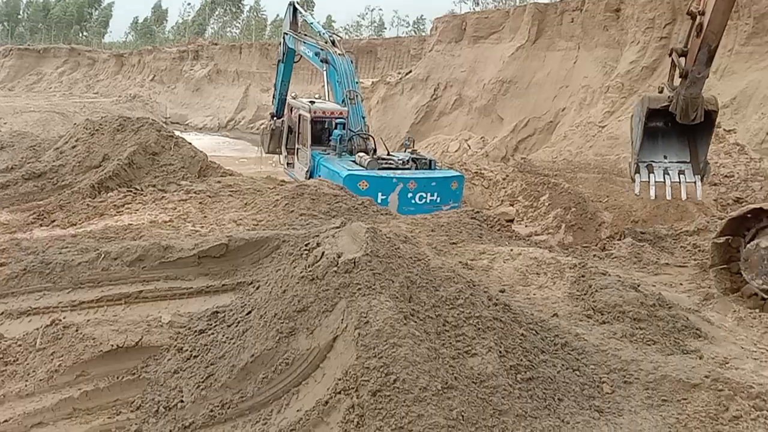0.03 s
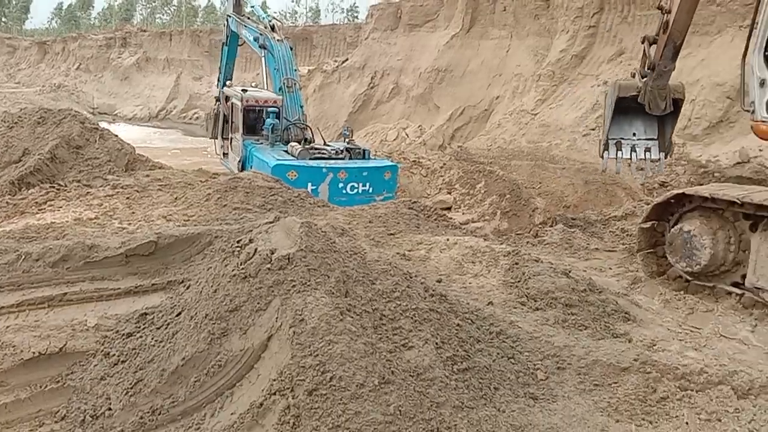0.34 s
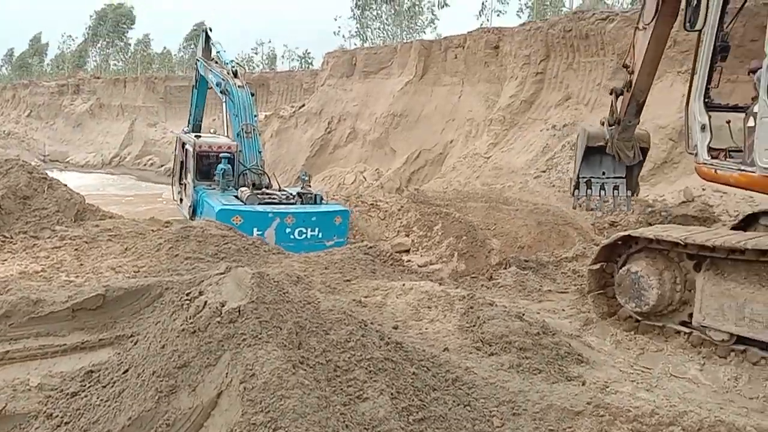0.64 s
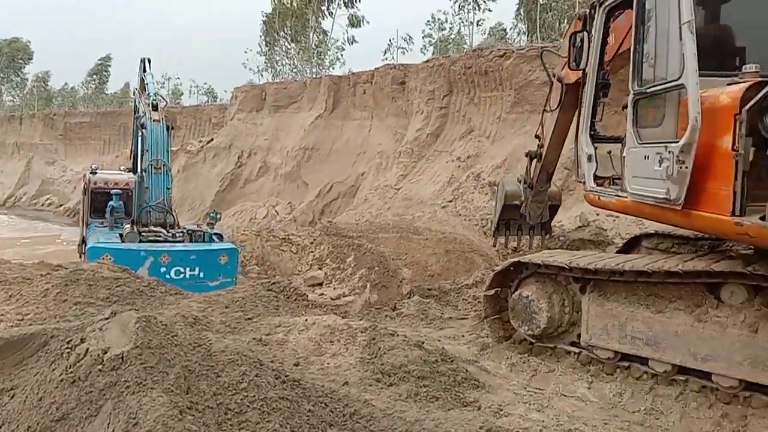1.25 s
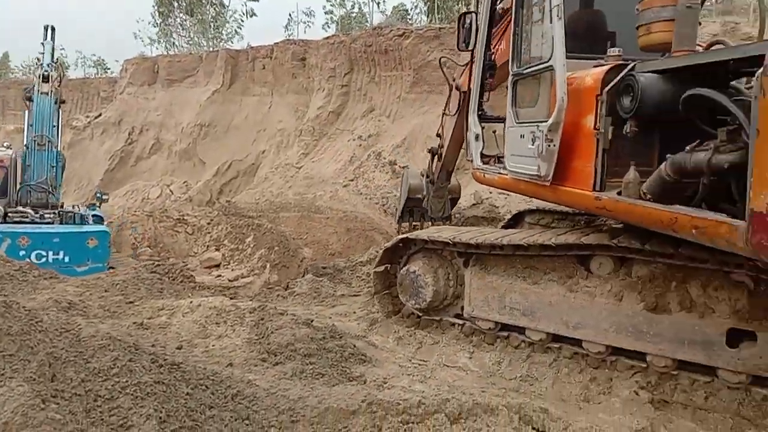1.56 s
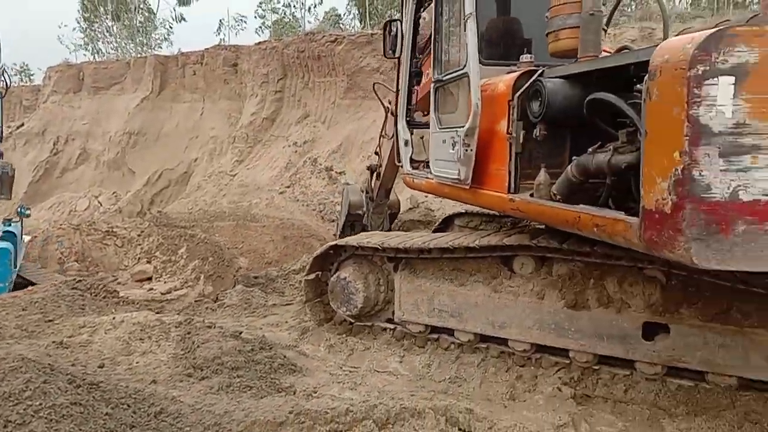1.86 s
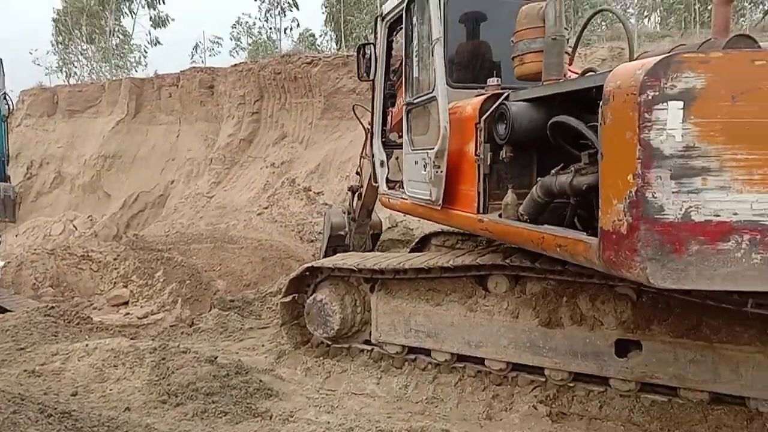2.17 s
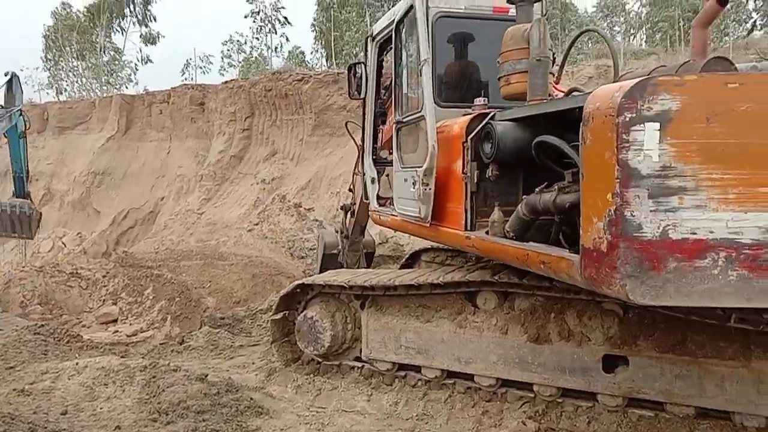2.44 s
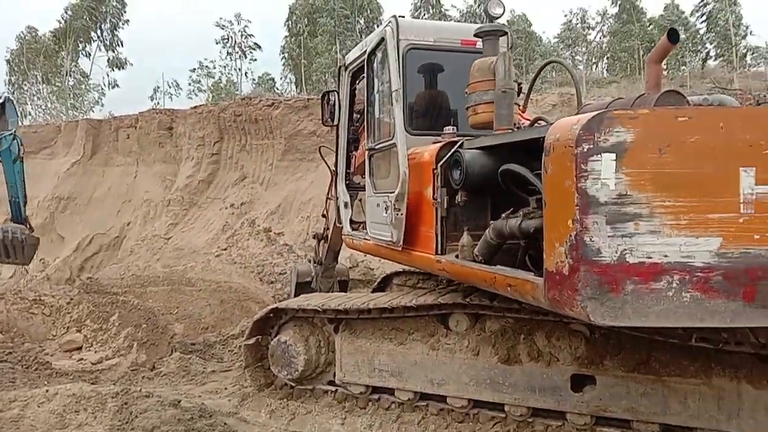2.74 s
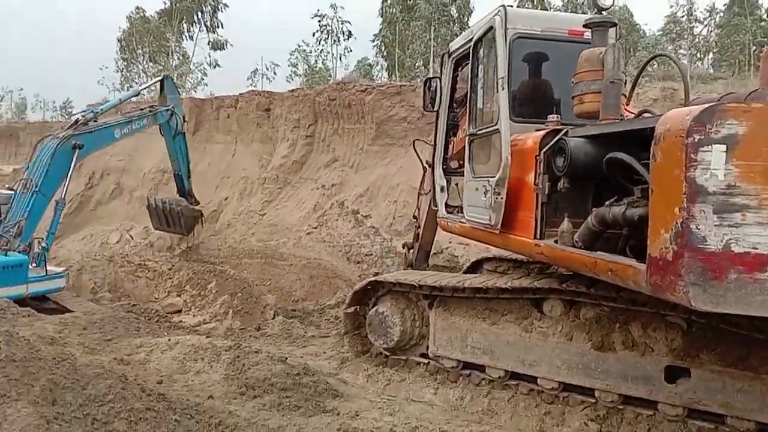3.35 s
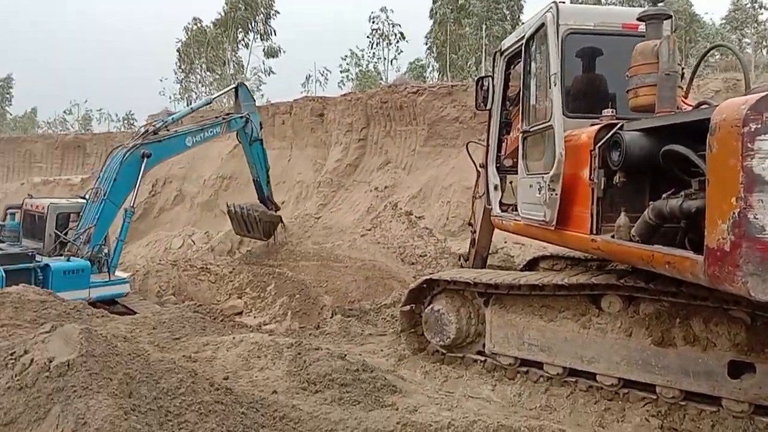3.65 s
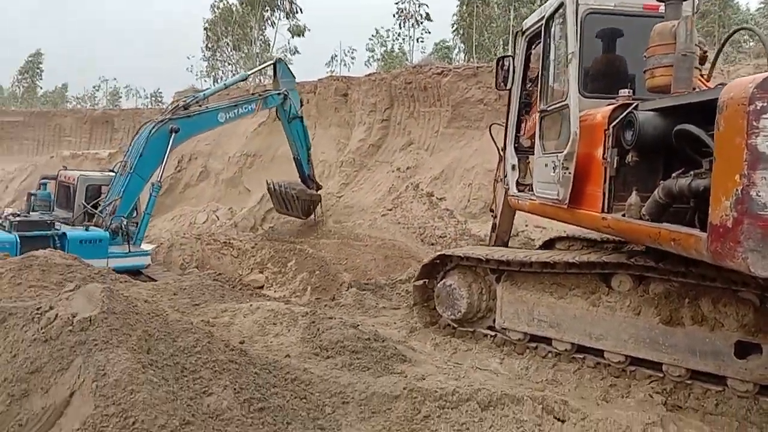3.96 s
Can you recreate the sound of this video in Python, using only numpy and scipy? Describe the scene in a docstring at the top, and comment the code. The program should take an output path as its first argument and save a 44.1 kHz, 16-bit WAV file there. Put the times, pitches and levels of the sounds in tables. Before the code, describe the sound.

A nearby excavator diesel engine clatters steadily in a sand pit, with a low fan hum and a hiss that swells midway. Behind it a second excavator drones and whines, rising briefly in pitch.

```python
"""A near diesel excavator clatters at a nearly steady speed in a sand pit: combustion knocks and valve
ticks modulate its air noise, its fan hums at the blade-passing frequency, and an open side hatch hisses.
A second excavator works behind it. Its exhaust drones in harmonics of the four-stroke cycle and its pump
drive whines at the gear-mesh frequency, both rising in pitch when the load comes off.
The sound fades in and is the same in both ears."""
import sys
import numpy as np
from scipy import signal
from scipy.fft import rfft, irfft
from scipy.io import wavfile

SR = 44100
rng = np.random.default_rng(int(sys.argv[2]) if len(sys.argv) > 2 else 0)


def file_out(sig):
    """Save sig as 16-bit WAV at sys.argv[1]."""
    # one column per channel
    cols = np.atleast_2d(sig).T
    # limit, then scale
    lim = np.clip(cols, -1, 1)
    pcm = np.round(lim * 32767).astype(np.int16)
    wavfile.write(sys.argv[1], SR, pcm)


N = 176400
TIME = np.arange(N) / SR


def from_db(db):
    """Amplitude ratio of a level in decibels."""
    return 10 ** (np.asarray(db) / 20)


def unit_rms(x):
    """Normalisation to an rms of 1."""
    return x / np.sqrt(np.mean(x ** 2) + 1e-20)


def in_time(rows):
    """Linear interpolation of each column of a time table to every sample."""
    times, *columns = np.transpose(rows)
    return [np.interp(TIME, times, column) for column in columns]


def at_hz(points, hz):
    """Interpolation of a spectrum on a logarithmic frequency axis."""
    f, value = np.transpose(points)
    return np.interp(np.log(np.maximum(hz, 1)), np.log(f), value)


def drift(rate_hz):
    """Slow random fluctuation: low-passed noise of unit rms."""
    step, settle = 40, 2000  # samples per coarse step; steps for the filter to settle
    pole = np.exp(-2 * np.pi * rate_hz * step / SR)
    noise = rng.standard_normal(N // step + settle + 2)
    slow = signal.lfilter([1], [1, -2 * pole, pole * pole], noise)[settle:]
    return np.interp(np.arange(N) / step, np.arange(len(slow)), unit_rms(slow))


def partial(turns, db):
    """Simple harmonic motion at an rms level, its phase counted in turns."""
    return np.sqrt(2) * from_db(db) * np.sin(2 * np.pi * (turns + rng.random()))


def die_away(clicks, decay_s):
    """Damping: each impulse decays exponentially."""
    return signal.lfilter([1], [1, -np.exp(-1 / (decay_s * SR))], clicks + 1e-18)


def resonance(centre_hz, half_width_hz):
    """A randomly driven resonance: narrow-band noise of unit rms, whose centre may move."""
    low_pass = signal.butter(2, half_width_hz, fs=SR, output="sos")
    in_phase, quadrature = signal.sosfilt(low_pass, rng.standard_normal((2, N)))
    angle = 2 * np.pi * np.cumsum(centre_hz * np.ones(N)) / SR
    return unit_rms(in_phase * np.cos(angle) + quadrature * np.sin(angle))


# Firing tone and rough growl of the exhaust: t/s, firing level/dB, growl level/dB
EXHAUST_LEVELS = [(.2, -28, -22.5), (.42, -30.5, -27.5), (.75, -29, -33.5), (1.1, -30, -35),
                  (1.65, -30, -30), (2.0, -29.5, -36), (2.4, -29.5, -49), (2.56, -33.5, -44),
                  (2.8, -26, -46), (3.0, -35.5, -49), (3.35, -27.5, -44), (3.65, -28, -37), (4, -38.5, -40)]
# Strong harmonics of the four-stroke cycle: harmonic number, level/dB
STRONG_HARMONICS = [(9, -38), (12, -32), (21, -41), (24, -37), (27, -43), (41, -37), (66, -37), (68, -38)]
# Envelope of the weak harmonics, due to unequal cylinders: f/Hz, level/dB
WEAK_HARMONICS = [(42, -54.5), (56, -49), (75, -58), (110, -52), (160, -45), (205, -41.5), (300, -47.5),
                  (500, -45.5), (720, -50), (900, -48.5), (1150, -47.5), (1600, -51)]


def exhaust(cycles, cycle_hz, firing_harmonic=6):
    """Periodic gas pulses form a harmonic series, over a broad growl and the narrow pipe resonance."""
    firing_db, growl_db = in_time(EXHAUST_LEVELS)
    strong_db = dict(STRONG_HARMONICS)
    growl = from_db(growl_db) * resonance(centre_hz=643.5, half_width_hz=40)
    pipe = from_db(-39.5) * resonance(centre_hz=605, half_width_hz=5.7)
    drone = np.zeros(N)
    for k in range(3, 105):
        mean_db = strong_db.get(k, at_hz(WEAK_HARMONICS, k * cycle_hz))
        wavering_db = mean_db + 3 * drift(rate_hz=1.3)
        drone += partial(k * cycles, firing_db if k == firing_harmonic else wavering_db)
    return growl + pipe + drone


# First three gear-mesh harmonics: t/s, first level/dB, second level/dB, third level/dB
WHINE_LEVELS = [(.2, -23, -36, -44), (.5, -16, -37, -44), (.7, -22.5, -31.5, -42), (1.1, -18.7, -29, -41),
                (1.45, -21.5, -42, -30), (1.75, -22.5, -44, -32), (2.0, -34, -46, -42),
                (2.25, -26, -46, -40), (2.6, -35, -37, -29.5), (2.95, -34, -32, -30.5),
                (3.15, -31.5, -42, -42), (3.58, -23, -36, -40), (4, -31, -47, -42)]


def pump_whine(meshes):
    """Periodic tooth contact in the pump drive radiates harmonics of the mesh frequency."""
    return sum(partial(k * meshes, db + 1.4 * drift(rate_hz=16))
               for k, db in enumerate(in_time(WHINE_LEVELS), 1))


# Gear-mesh frequency, proportional to the working engine's speed: t/s, f/Hz
MESH_FREQUENCY = [(.2, 1036), (.36, 1042), (.5, 1037), (.68, 1050), (.85, 1044), (1.3, 1043), (1.6, 1040),
                  (1.87, 1029), (2.0, 1055), (2.15, 1116), (2.28, 1129), (2.45, 1098), (2.6, 1074),
                  (2.9, 1088), (3.1, 1069), (3.4, 1052), (3.56, 1036), (3.75, 1028), (4, 1024)]


def working_excavator(meshes_per_cycle=70, speed_jitter=.0005):
    """A fixed gear ratio locks the whine and the exhaust harmonics to one engine speed."""
    mesh_hz = in_time(MESH_FREQUENCY)[0] * (1 + speed_jitter * drift(rate_hz=14.6))
    meshes = np.cumsum(mesh_hz) / SR
    return pump_whine(meshes) + exhaust(meshes / meshes_per_cycle, mesh_hz.mean() / meshes_per_cycle)


# Rasp from the open hatch: t/s, centre f/Hz, level/dB
HATCH_RASP = [(.3, 2630, -36), (1.2, 3166, -47), (1.7, 3032, -25), (2.05, 3148, -30.5), (2.4, 3250, -25.5),
              (2.85, 3307, -30), (3.1, 3344, -29.5), (4, 3310, -31)]
# Highest band of hiss: t/s, centre f/Hz, level/dB
TOP_HISS = [(.3, 12770, -56), (1.1, 13130, -51), (1.5, 13800, -43), (1.8, 14680, -40), (2.2, 14870, -48),
            (3.1, 14800, -46), (3.65, 14700, -41), (4, 14350, -46)]


def hatch_hiss():
    """Band-limited noise: a rasp and a high hiss swell and shift in pitch."""
    rasp_hz, rasp_db = in_time(HATCH_RASP)
    top_hz, top_db = in_time(TOP_HISS)
    rasp = from_db(rasp_db) * resonance(rasp_hz, half_width_hz=360)
    return rasp + from_db(top_db) * resonance(top_hz, half_width_hz=830)


# Blade-passing tone of the near fan: t/s, f/Hz, level/dB
FAN_TONE = [(.3, 225, -23.7), (1.2, 225.2, -23.5), (1.9, 224.2, -23.6), (2.3, 221.8, -24),
            (2.6, 222.4, -25.3), (2.95, 224.3, -26), (3.4, 225.6, -25.4), (4, 222.3, -28)]


def fan():
    """Periodic blade passage gives a tone and its octave; returns the hum and the count of passes."""
    blade_hz, level_db = in_time(FAN_TONE)
    passes = np.cumsum(blade_hz) / SR
    waver_db = 1.14
    fundamental = partial(passes, level_db + waver_db * drift(rate_hz=7.4))
    octave = partial(2 * passes, -41 + waver_db * drift(rate_hz=6))
    return fundamental + octave, passes


# Knock of each near cylinder, in firing order: relative level/dB
CYLINDER_KNOCKS = [4, -5, 2, 1, -5, -4.5]


def knocks_and_ticks(crank_turns, knock_spread_db=4.5, ticks_per_s=290):
    """Amplitude modulation of air noise by combustion knocks and random valve ticks."""
    cylinders = len(CYLINDER_KNOCKS)
    firings = np.floor(crank_turns * cylinders / 2).astype(int)  # each fires once in two turns
    onsets = np.flatnonzero(np.diff(firings))
    ticks = (rng.random(N) < ticks_per_s / SR) * rng.random(N)
    air = rng.standard_normal(N)
    cylinder_db = np.array(CYLINDER_KNOCKS)[firings[onsets] % cylinders]
    knocks = np.zeros(N)
    knocks[onsets] = from_db(cylinder_db + knock_spread_db * rng.standard_normal(N)[onsets])
    return air * (1 + .26 * die_away(knocks, decay_s=.0062) + .35 * die_away(ticks, decay_s=.00094))


# Frequency response of the engine bay: f/Hz, relative level/dB
BAY_RESPONSE = [(25, -27), (42, -27), (52, -4.5), (64, -9), (100, 0), (150, -5), (205, 6.5), (290, -3),
                (400, -2), (550, -1), (700, -6.5), (850, 2.5), (1100, 1), (1400, -3), (1900, -6.5),
                (2400, -4), (3200, -1), (4000, -2), (4900, -4.5), (5700, -1), (6400, -8), (7200, -19),
                (8600, -32.5), (9400, -45), (10000, -39.5), (10900, -33), (11500, -36), (12600, -22.5),
                (15400, -26.5)]
# Centres of the overlapping bass, middle and treble bands: f/Hz
BAND_CENTRES = [200, 1100, 4500]
# Gain of the clatter's bands: t/s, bass level/dB, middle level/dB, treble level/dB
BAND_GAINS = [(.2, -10, -14, -19), (.42, -15, -15.5, -21), (.7, -19.5, -17.5, -20), (1.1, -20, -19, -19.5),
              (1.75, -17.5, -19.5, -20), (2.0, -19, -18.5, -21), (2.4, -17.5, -19, -19.5),
              (2.9, -25, -20, -19), (3.2, -22.5, -20.5, -21), (3.65, -24, -19, -21.5), (4, -18, -20.5, -22)]


def engine_clatter(crank_turns, echo_s=.071, echo_db=-9.5):
    """Source and filter: the engine bay colours the knocking noise, and the sand cliff reflects it."""
    direct = knocks_and_ticks(crank_turns)
    echo = from_db(echo_db) * np.interp(TIME - echo_s, TIME, direct, left=0)
    hz = np.arange(N // 2 + 1) * SR / N
    coloured = irfft(rfft(direct + echo) * from_db(at_hz(BAY_RESPONSE, hz)), N)
    spectrum = rfft(unit_rms(coloured))
    clatter = np.zeros(N)
    for weights, gain_db in zip(np.eye(len(BAND_CENTRES)), in_time(BAND_GAINS)):
        band = at_hz(list(zip(BAND_CENTRES, weights)), hz)  # 1 at its own centre, 0 at the others
        clatter += from_db(gain_db) * irfft(spectrum * band, N)
    return clatter


def near_excavator(passes_per_crank_turn=7.68):
    """A fixed drive ratio ties the engine's firing rate to the fan's hum."""
    hum, passes = fan()
    return hum + hatch_hiss() + engine_clatter(passes / passes_per_crank_turn)


def scene():
    """Superposition of both machines at one point, alike in both ears."""
    return np.tile(working_excavator() + near_excavator(), (2, 1))


def record(dry):
    """A linear fade-in, then a steep low-pass filter that cuts the highest treble."""
    fade_start_s, fade_s, cutoff_hz = .14, .22, 15600
    fade = np.clip((TIME - fade_start_s) / fade_s, 0, 1)
    low_pass = signal.ellip(12, .1, 80, cutoff_hz, fs=SR, output="sos")
    return signal.sosfilt(low_pass, dry * fade)


dry = scene()
out = record(dry)
file_out(out)
```